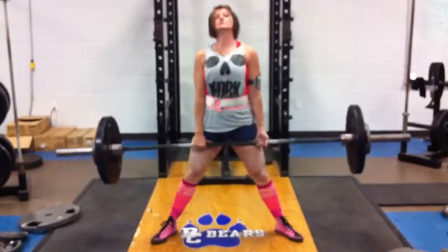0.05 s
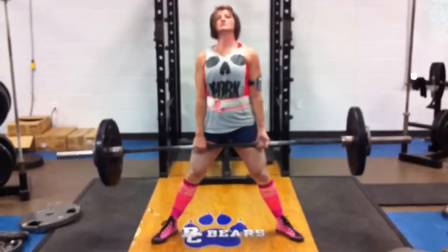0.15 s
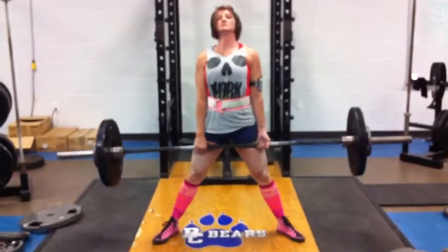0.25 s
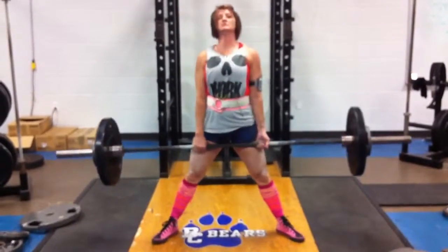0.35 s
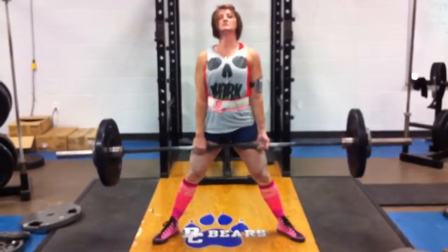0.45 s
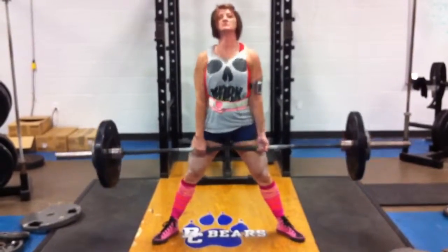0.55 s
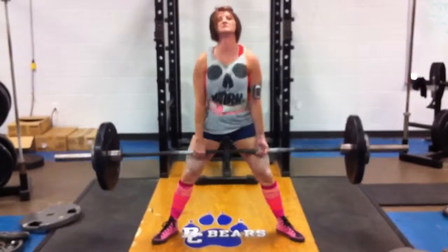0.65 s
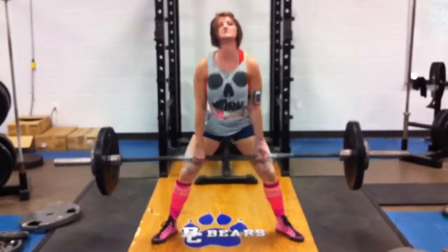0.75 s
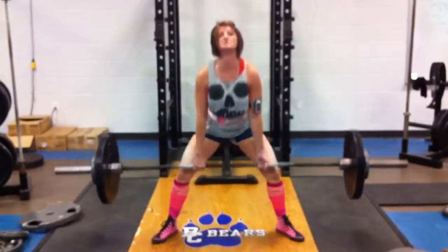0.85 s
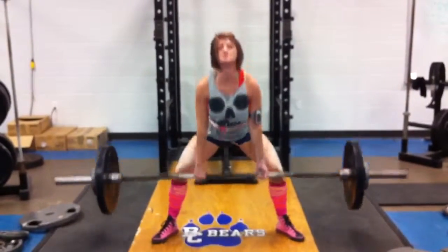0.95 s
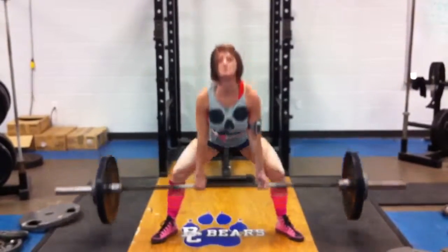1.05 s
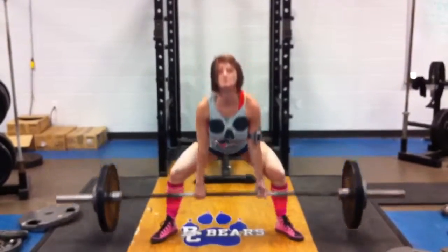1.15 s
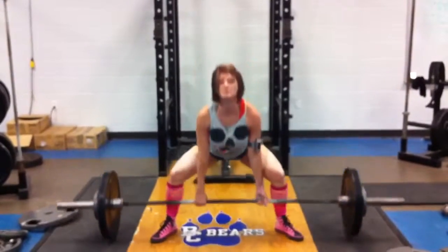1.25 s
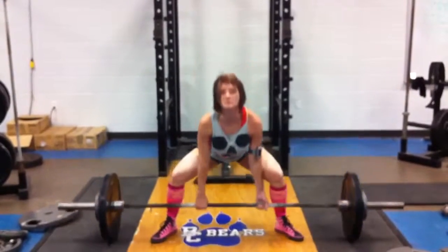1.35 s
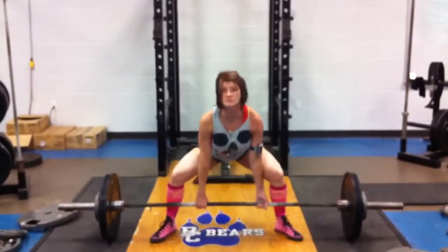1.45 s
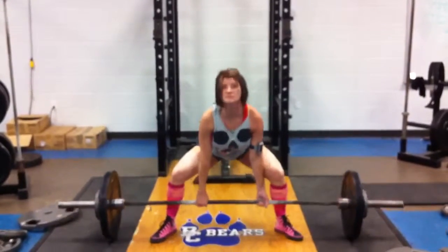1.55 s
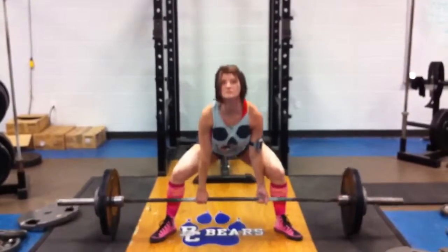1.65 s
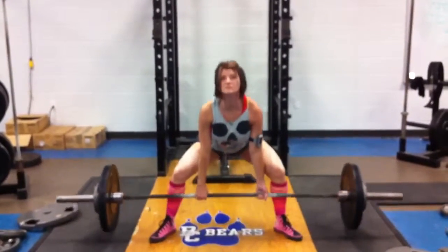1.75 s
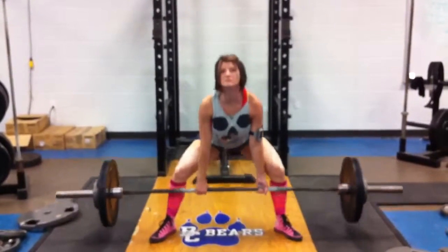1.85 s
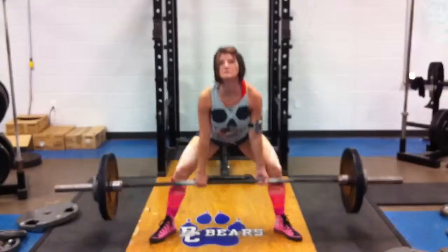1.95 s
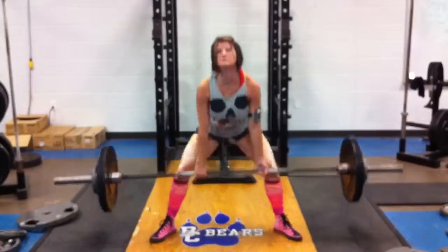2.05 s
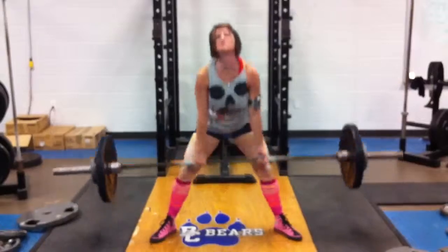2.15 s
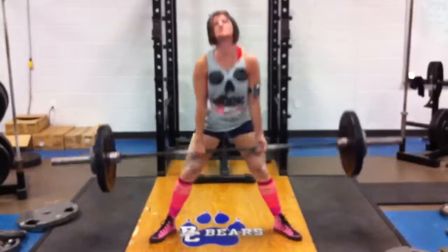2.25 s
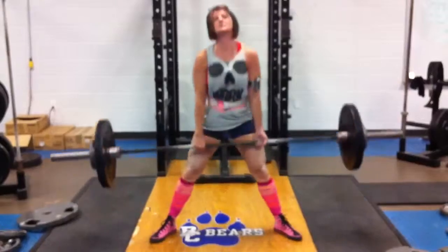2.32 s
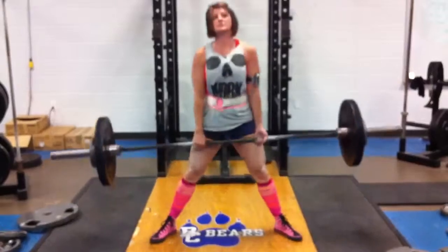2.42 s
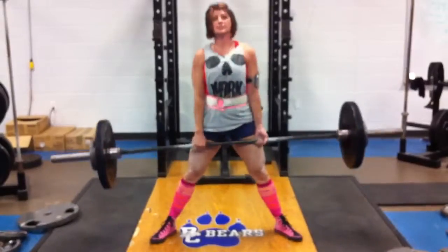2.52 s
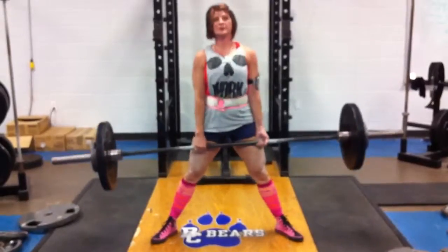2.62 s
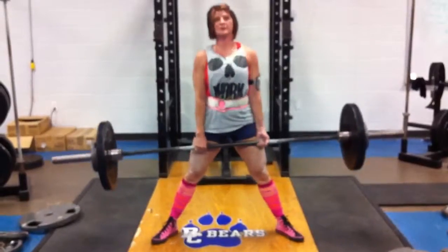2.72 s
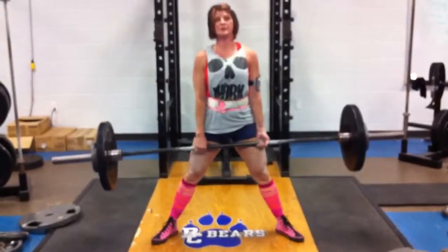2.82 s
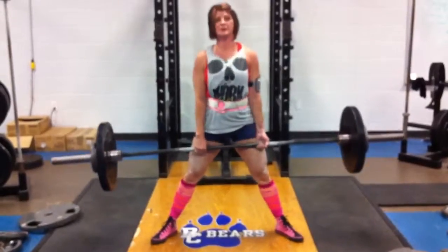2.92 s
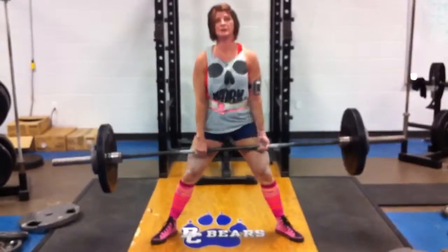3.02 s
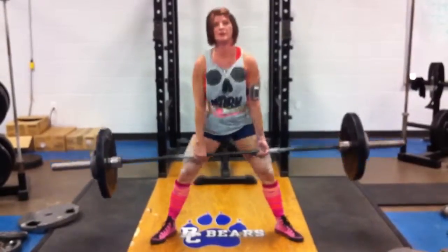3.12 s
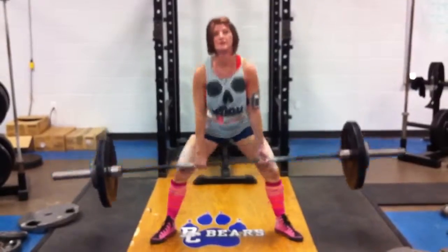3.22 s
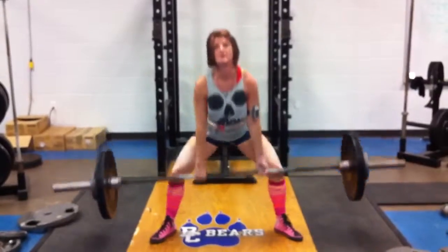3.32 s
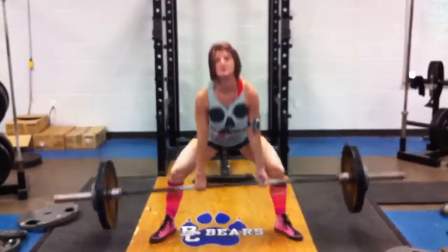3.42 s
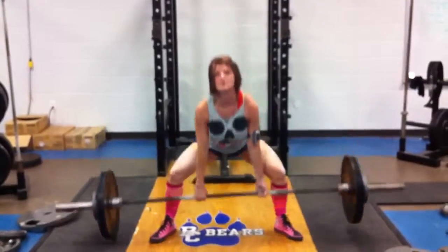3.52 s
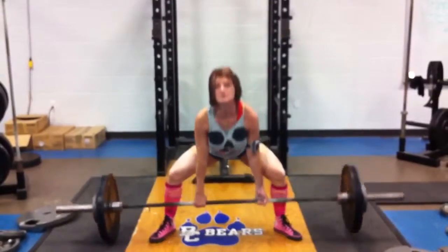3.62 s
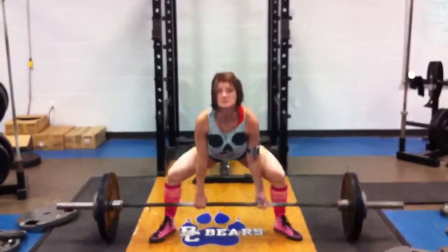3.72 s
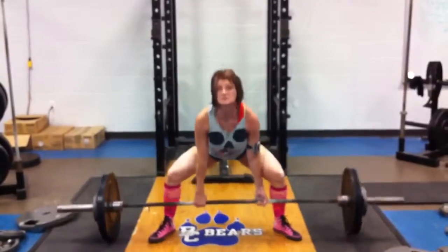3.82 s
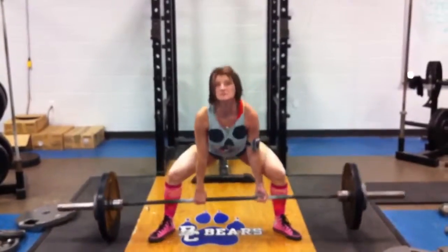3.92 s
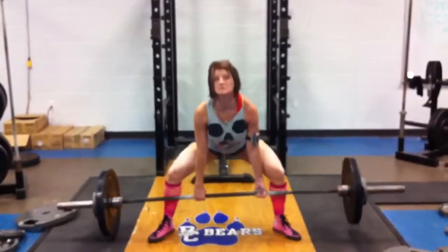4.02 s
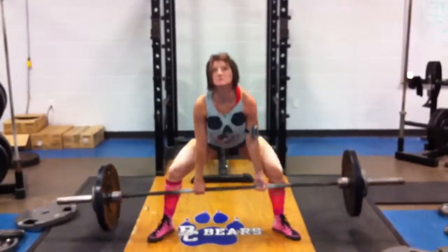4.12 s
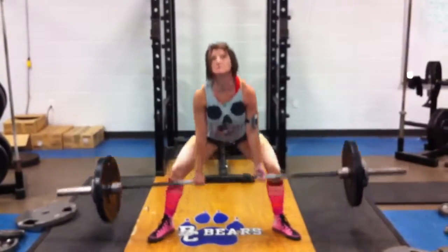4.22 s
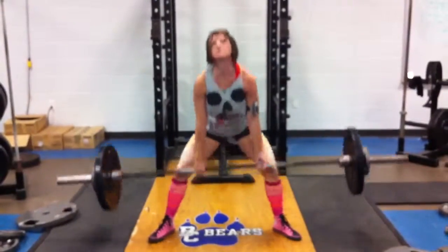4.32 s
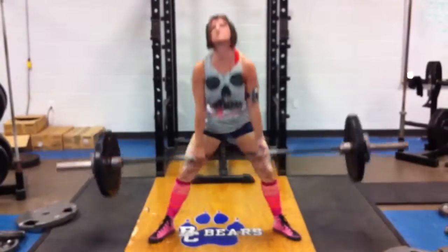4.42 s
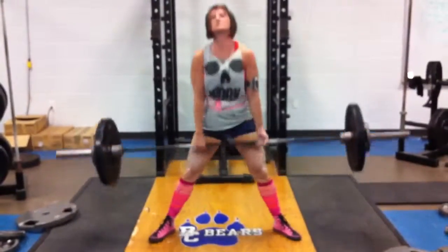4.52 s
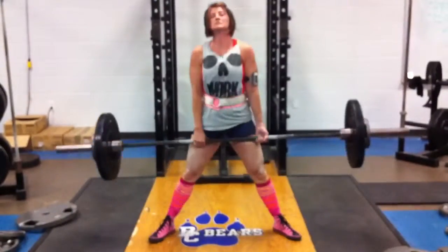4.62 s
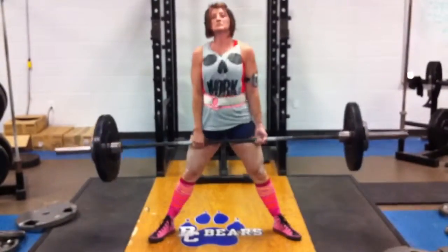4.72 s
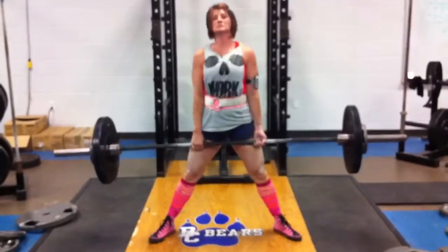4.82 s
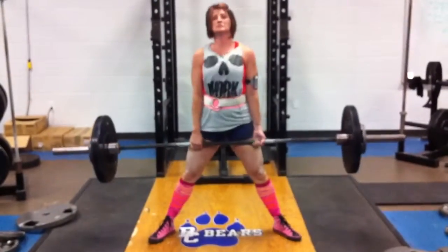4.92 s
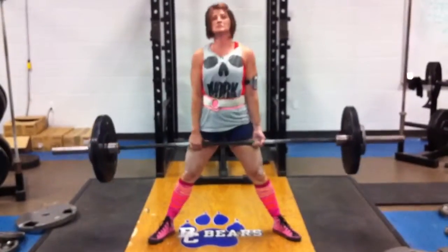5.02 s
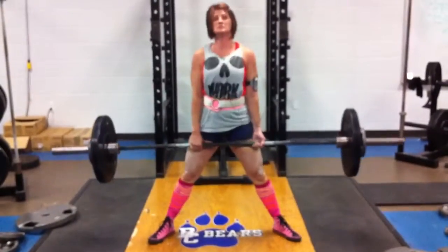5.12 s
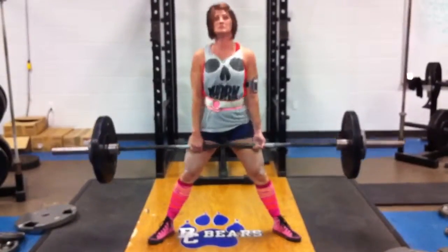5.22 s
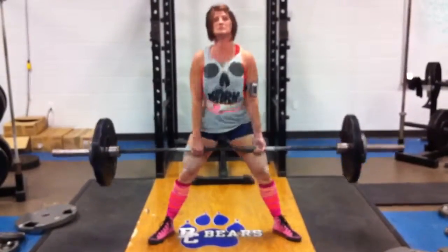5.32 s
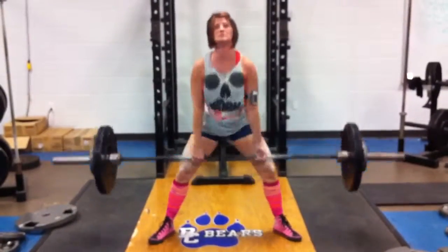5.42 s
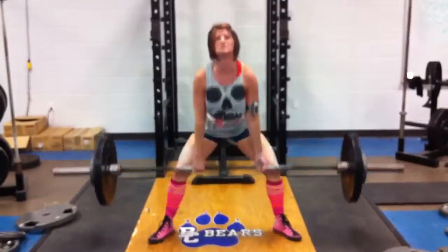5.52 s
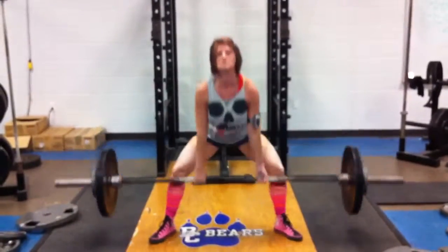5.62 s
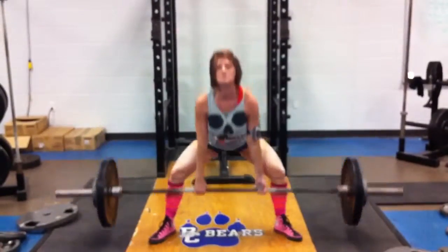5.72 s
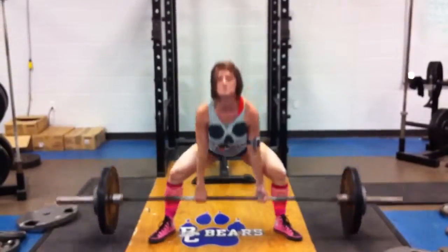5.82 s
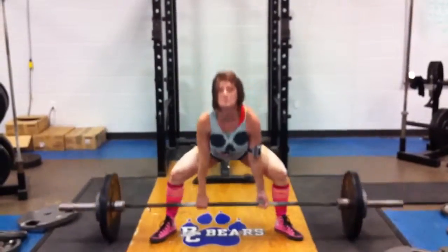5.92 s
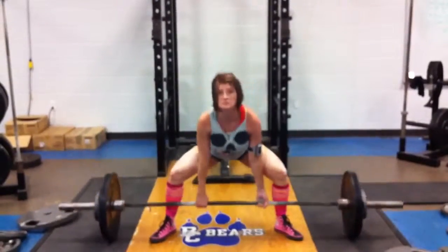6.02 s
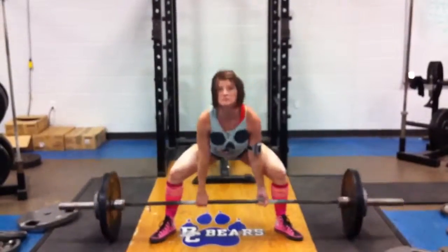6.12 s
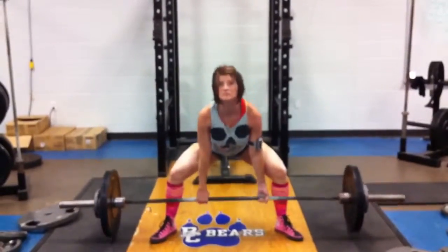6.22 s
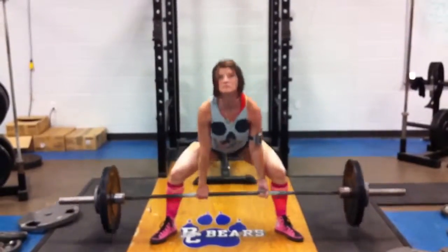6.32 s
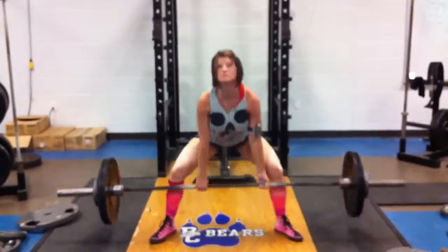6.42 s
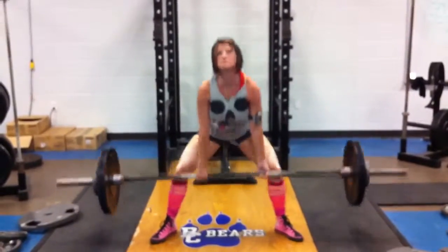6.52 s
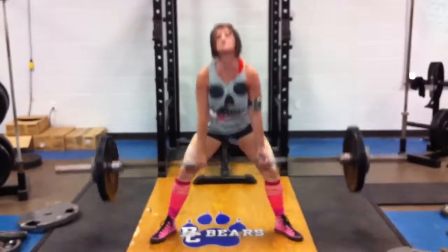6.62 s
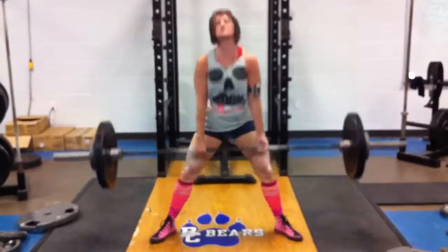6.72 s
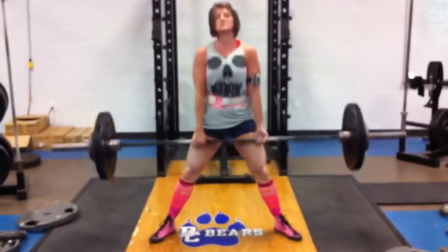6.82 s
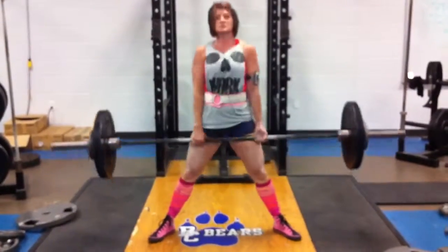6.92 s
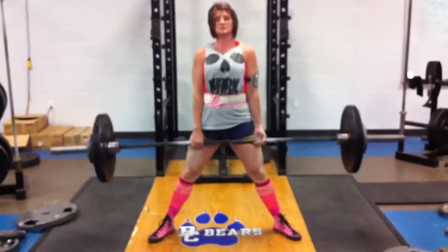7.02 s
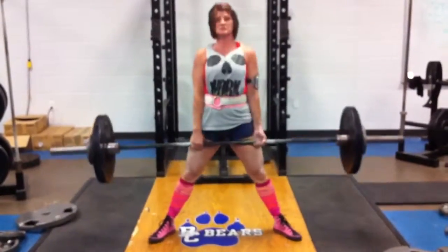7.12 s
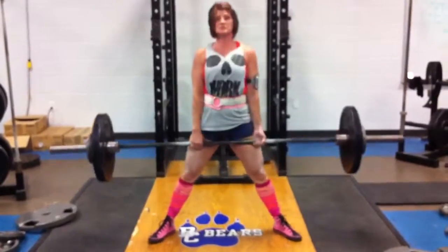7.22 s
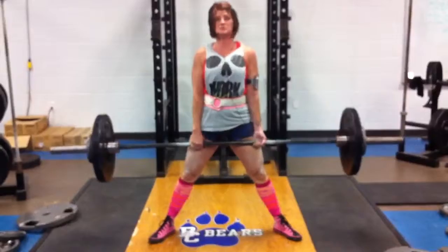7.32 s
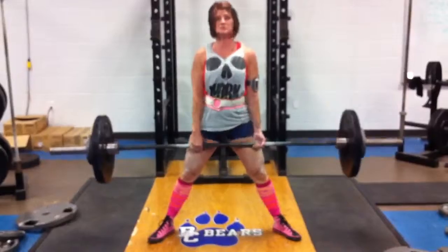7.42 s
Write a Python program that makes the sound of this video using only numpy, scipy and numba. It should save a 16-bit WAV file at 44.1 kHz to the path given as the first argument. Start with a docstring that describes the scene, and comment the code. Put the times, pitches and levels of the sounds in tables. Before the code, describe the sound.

A loaded barbell lands three times on a rubber gym platform, its iron plates clanking and ringing over a steady ventilation hiss.

```python
"""A barbell set down in a gym

A loaded barbell lands three times on a rubber-topped platform in a hard-walled gym. Each time the rubber
thuds, the loose iron plates clatter against each other and the bar's ends, and the steel bar rings.
Air vents hiss and hum throughout. An automatic volume control dips at each clank and creeps back up."""
import sys
import numpy as np
from scipy import signal
from scipy.fft import rfft, irfft, next_fast_len
from scipy.io import wavfile
from numba import njit

SR = 44100
rng = np.random.default_rng(int(sys.argv[2]) if len(sys.argv) > 2 else 0)


def write(x):
    x = np.atleast_2d(x).T
    wavfile.write(sys.argv[1], SR, np.round(np.clip(x, -1, 1) * 32767).astype(np.int16))


N = 328924

# A spectrum says how strong each pitch is next to the others. A fade time is the time to drop 60 dB.
# Air rushing from the vents: pitch_hz, level_db
AIR_SPECTRUM = [(25, -45), (55, -34), (110, -12), (200, -7.5), (400, -7), (700, -6.5), (1200, -5.5),
                (2000, -8.5), (3000, -3.5), (3900, -10.5), (5800, -13.5), (8000, -20), (11000, -20),
                (15500, -34)]
# Fan tones, which mostly waver below the listed level: pitch_hz, level_db, waver_db
FAN_TONES = [(122, -63.5, 4.5), (262.5, -50.5, 3), (330.5, -54, 1), (372.3, -54.5, 2.5),
             (423.5, -51.5, 8.5), (524, -55, 2.5)]
# The building's dull background noise: pitch_hz, level_db
BUILDING_SPECTRUM = [(80, -22.5), (200, -5.5), (330, 2.5), (500, 1), (900, -13), (2000, -18)]
# The bar lands and its plates clatter: start_s, level_db, change_db_per_hit, brightness_db_per_octave
BAR_LANDINGS = [(1.457, -6.5, -1, 1.3), (3.749, -10, -4.5, 1), (6.051, -9.5, 0.7, 0.2)]
# The bar rocks and the plates knock again: start_s, level_db
LATER_KNOCKS = [(1.588, -8.5), (1.875, -25), (3.858, -13.5), (3.884, -7), (3.903, -12), (3.982, -15.5),
                (4.09, -21.5), (6.135, -8), (6.211, -11), (6.364, -23.5), (6.612, -36.5)]
# The notes of bar and plates, which sit differently at each landing:
# pitch_hz, base_fade_s, first_landing_db, second_landing_db, third_landing_db
METAL_NOTES = [(1150.0, 1.5, -21.0, -17.0, -18.0), (1315.0, 1.8, -21.0, -16.0, -21.0),
               (2062.0, 1.82, -19.0, -13.0, -20.0), (2373.0, 1.83, -13.0, -12.0, -5.0),
               (2762.0, 1.84, -16.0, -16.0, -13.0), (2940.0, 2.0, -7.0, -3.0, -7.0),
               (3010.0, 1.85, -6.0, -6.0, -9.0), (3295.0, 1.97, -1.0, -5.0, -3.0),
               (3450.0, 1.8, -10.0, -11.0, -8.0), (3815.0, 1.75, -13.0, -13.0, -9.0),
               (4190.0, 1.71, -19.0, -14.0, -17.0), (4585.0, 1.67, -12.0, -14.0, -17.0),
               (4959.0, 1.62, -13.0, -14.0, -7.0), (5168.0, 1.6, -18.0, -19.0, -13.0),
               (5388.0, 1.57, -14.0, -11.0, -11.0), (5828.0, 2.1, -2.0, -9.0, -8.0),
               (6285.0, 1.46, -11.0, -8.0, -6.0), (6745.0, 1.4, -14.0, -13.0, -13.0),
               (7176.0, 1.34, -11.0, -14.0, -8.0), (7655.0, 1.28, -15.0, -18.0, -15.0),
               (8138.0, 1.21, -13.0, -14.0, -9.0), (8652.0, 1.14, -8.0, -10.0, -8.0),
               (9157.0, 1.07, -13.0, -14.0, -13.0), (9690.0, 1.0, -11.0, -16.0, -10.0),
               (10560.0, 0.82, -2.0, -7.0, -6.0), (11280.0, 0.83, -16.0, -14.0, -13.0),
               (12330.0, 0.77, -14.0, -15.0, -12.0), (13490.0, 0.69, -15.0, -19.0, -17.0),
               (14070.0, 0.66, -21.0, -14.0, -20.0), (15240.0, 0.6, -18.0, -22.0, -22.0)]
# The clang, a crowd of weaker plate notes blurred by the room: pitch_hz, level_db
CLANG_SPECTRUM = [(200, -31), (900, -12), (1220, -6), (1650, -10), (2400, -4), (2700, -4.5), (3000, 2.5),
                  (3550, -6), (4100, -8), (6500, -7.5), (9700, -14), (10600, 0), (12200, -13.5),
                  (15000, -19)]
# How long the clang lasts: pitch_hz, fade_s
CLANG_FADES = [(400, 0.83), (1200, 1.7), (3000, 1.86), (6000, 1.68), (10500, 0.93), (15000, 0.38)]
# The brief crack of iron meeting iron: pitch_hz, level_db
CRACK_SPECTRUM = [(300, -22), (900, -10), (1600, 1), (2400, -1), (3600, 9.5), (4400, 0), (7000, -4.5),
                  (9500, 0), (11000, 3), (13000, -5), (15500, -27)]
# The plates' rims meet the platform: start_s, level_db
THUD_HITS = [(1.458, -15), (3.751, -18), (3.858, -22), (6.054, -22.5)]
# The platform's dull thud: pitch_hz, level_db
THUD_SPECTRUM = [(30, -25), (80, -10), (160, -2), (250, 1.5), (500, -6.5), (900, -14), (2000, -10)]


def gain(db):
    """Turn decibels into a number to multiply a sound by."""
    return 10 ** (np.asarray(db) / 20)


def normalize(x):
    """Scale a signal so its average strength (rms) is 1."""
    return x / np.sqrt(np.mean(x ** 2))


def look_up(table, hz):
    """Read between a table's rows, with pitch counted in octaves."""
    pitches, values = np.transpose(table)
    return np.interp(np.log(np.maximum(hz, 1)), np.log(pitches), values)


def noise(spectrum, size):
    """Noise of strength 1 with the given spectrum."""
    hz = np.arange(size // 2 + 1) * SR / size
    return normalize(irfft(rfft(rng.standard_normal(size)) * gain(look_up(spectrum, hz)), size))


def wander(turns_per_s):
    """A slow random curve of strength 1."""
    turns = np.arange(N) / SR * turns_per_s
    return normalize(np.interp(turns, np.arange(512), rng.standard_normal(512)))


def tone(hz, drift_hz=1.0):
    """A slightly unsteady pure tone of strength 1."""
    return np.sqrt(2) * np.sin(2 * np.pi * np.cumsum(hz + drift_hz * wander(9)) / SR)


def ventilation(air_db=-35.5, swell_db=0.25):
    """Air rushes steadily from the vents while fan tones waver in the room."""
    air = gain(air_db + swell_db * wander(2.13)) * noise(AIR_SPECTRUM, next_fast_len(N))[:N]
    fans = sum(gain(db + waver_db * (wander(4.5) - 1.5)) * tone(hz) for hz, db, waver_db in FAN_TONES)
    return air + fans


def building_noise(level_db=-48, swell_db=0.5):
    """The building's dull noise swells slowly under the hiss."""
    return gain(level_db - swell_db * wander(1.39)) * noise(BUILDING_SPECTRUM, next_fast_len(N))[:N]


def hum(pitch_hz=212, full_db=-48, full_at_s=3.5, rise_db_per_s=8, fall_db_per_s=1.7, waver_db=1.5):
    """One more low hum grows, then sinks slowly, wavering all along."""
    since_full_s = np.arange(N) / SR - full_at_s
    db = full_db + np.minimum(rise_db_per_s * since_full_s, -fall_db_per_s * since_full_s)
    return gain(db + waver_db * wander(3.01)) * tone(pitch_hz)


def plate_hits(per_landing=4, first_gap_s=0.008, gap_growth=1.7, graze_db=-5, dulling=0.26, hard_db=-1.5):
    """Every hit of iron on iron, as rows of start_s, level_db, brightness_db_per_octave."""
    # The plates hit one after another, ever further apart; the first only grazes.
    clatter = [(s + first_gap_s * k ** gap_growth, db + change_db * (k - 1) + graze_db * (k == 0), bright)
               for s, db, change_db, bright in BAR_LANDINGS for k in range(per_landing)]
    knocks = [(s, db, dulling * (db - hard_db)) for s, db in LATER_KNOCKS]  # softer knocks are duller
    return np.array(clatter + knocks)


def hit_strengths(hz, pivot_hz=3500):
    """How strong each hit is at each pitch: bright hits favour the high ones."""
    _, db, brightness = plate_hits().T
    return gain(db[:, None] + brightness[:, None] * np.log2(hz / pivot_hz))


def metal_rings(t, copies=4, spread_hz=9, spread_share=0.00207, fade_speedup=1.19):
    """One ring per hit. Each note is a cluster of close pitches, since the plates are nearly alike."""
    hz, base_fade_s, *landing_db = np.repeat(np.array(METAL_NOTES, float), copies, axis=0).T
    offsets = np.tile(np.linspace(-1, 1, copies), len(METAL_NOTES)) + .3 * rng.standard_normal(len(hz))
    cluster_hz = hz + (spread_hz + spread_share * hz) * offsets
    angle = np.outer(np.float32(2 * np.pi * cluster_hz), np.float32(t))
    fade = np.exp(np.outer(np.float32(-np.log(1000) * fade_speedup / base_fade_s), np.float32(t)))
    landing_of_hit = np.searchsorted(np.array(BAR_LANDINGS)[:, 0], plate_hits()[:, 0], side="right") - 1
    strength = hit_strengths(hz) * gain(landing_db)[landing_of_hit] / np.sqrt(copies)
    phase = rng.uniform(0, 2 * np.pi, strength.shape)  # each wave starts at a random point in its swing
    sines = np.float32(strength * np.cos(phase)) @ (fade * np.sin(angle))
    cosines = np.float32(strength * np.sin(phase)) @ (fade * np.cos(angle))
    return sines + cosines


def plate_clangs(t, bands=12, width_hz=35, width_share=0.01, boost_db=8):
    """One noisy wash per hit, crowding round the main notes; the highest pitches die first."""
    size = 2 ** 17
    hz = np.arange(size // 2 + 1) * SR / size
    to_note_hz = np.min([np.abs(hz - note[0]) for note in METAL_NOTES], axis=0)
    closeness = 1 / (1 + (to_note_hz / (width_hz + width_share * hz)) ** 2)
    wash = rfft(noise(CLANG_SPECTRUM, size)) * gain(boost_db * (closeness - .5))
    centres_hz = np.geomspace(400, 15000, bands)
    octaves = np.log2(np.maximum(hz, 1))
    starts = rng.integers(0, size, len(plate_hits()))  # each hit gets its own stretch of the noise
    clangs = np.zeros((len(starts), len(t)), np.float32)
    for centre_hz, this_band, strengths in zip(centres_hz, np.eye(bands), hit_strengths(centres_hz).T):
        band_shape = np.interp(octaves, np.log2(centres_hz), this_band)
        band = np.float32(np.tile(irfft(wash * band_shape), 2))
        fade = np.float32(np.exp(-np.log(1000) * t / look_up(CLANG_FADES, centre_hz)))
        for clang, start, strength in zip(clangs, starts, strengths):
            clang += float(strength) * fade * band[start:start + len(t)]
    return clangs


def add(track, start_s, sound):
    """Mix a sound into the track at the given time."""
    start = int(start_s * SR)
    track[start:start + len(sound)] += sound[:N - start]


def barbell(ring_db=-13, clang_db=-8, crack_db=-5, crack_s=0.034, rise_s=0.0015, length_s=1.5):
    """Every hit cracks, then rings on in the metal and the room."""
    t, track = np.arange(int(length_s * SR)) / SR, np.zeros(N)
    rise = 1 - np.exp(-t / rise_s)
    for (start_s, db, _), ring, clang in zip(plate_hits(), metal_rings(t), plate_clangs(t)):
        crack = gain(db) * np.exp(-t / crack_s) * noise(CRACK_SPECTRUM, len(t))
        clank = gain(ring_db) * ring + gain(clang_db) * clang + gain(crack_db) * crack
        add(track, start_s, rise * clank)
    bass_cut = signal.butter(2, 250, "high", fs=SR, output="sos")  # plates this small give off no bass
    return signal.sosfilt(bass_cut, track)


def platform(thud_fade_s=0.086, room_fade_s=1.0, room_db=-15, squash_s=0.0064):
    """The rubber gives under the weight with a short, dull thud that lingers in the room."""
    t, track = np.arange(SR) / SR, np.zeros(N)
    rise = 1 - np.exp(-t / squash_s)
    fade = np.exp(-np.log(1000) * t / thud_fade_s)
    echo = gain(room_db) * np.exp(-np.log(1000) * t / room_fade_s)
    for start_s, db in THUD_HITS:
        add(track, start_s, gain(db) * rise * (fade + echo) * noise(THUD_SPECTRUM, len(t)))
    return track


def scene():
    """All the sounds together, the same on the left and the right."""
    mix = barbell() + platform() + ventilation() + hum() + building_noise()
    return np.tile(mix, (2, 1))


@njit
def loudness_follower(x, rise_share, fall_share):
    """Track a level, moving a share of the way towards it at each sample."""
    levels, level = np.empty(len(x)), 0.
    for i in range(len(x)):
        level += (x[i] - level) * (rise_share if x[i] > level else fall_share)
        levels[i] = level
    return levels


def record(dry, limit_db=-9, react_s=0.0031, recover_s=1.98, ahead_s=0.0012, top_hz=15850):
    """The volume control holds clanks down and recovers slowly; peaks are rounded, the top treble cut."""
    level = loudness_follower(np.abs(dry[0]), 1 / (react_s * SR), 1 / (recover_s * SR))
    level_ahead = np.interp(np.arange(N) + ahead_s * SR, np.arange(N), level)
    held = dry / (1 + (level_ahead / gain(limit_db)) ** 4) ** (1 / 4)
    rounded = held / (1 + (held / .72) ** 6) ** (1 / 6)
    treble_cut = signal.ellip(10, .2, 80, top_hz, fs=SR, output="sos")
    return signal.sosfilt(treble_cut, rounded)


dry = scene()
out = record(dry)
write(out)
```